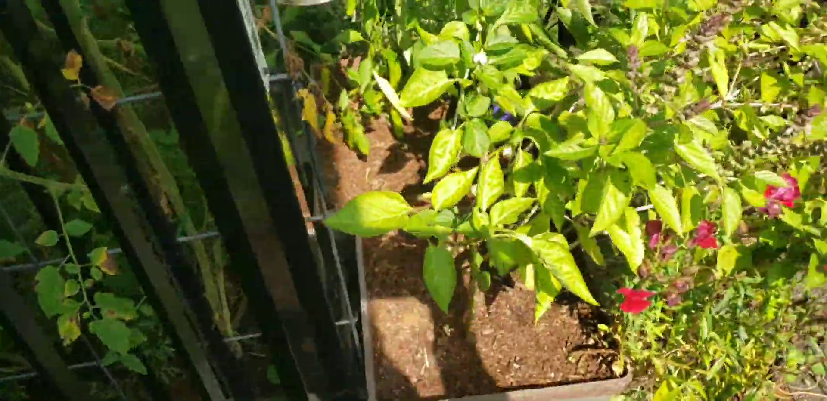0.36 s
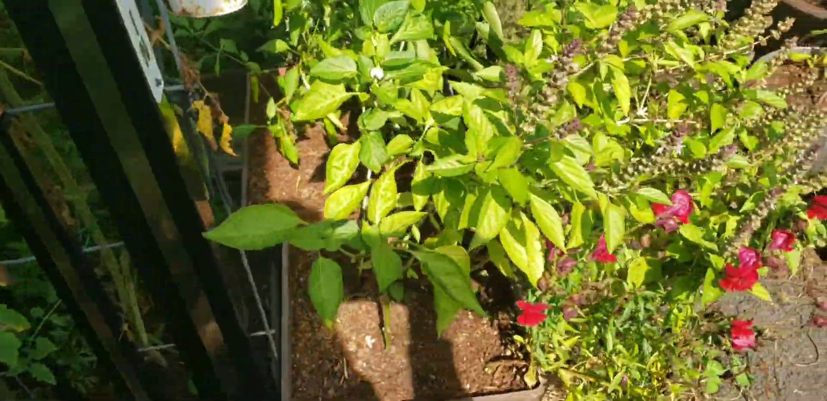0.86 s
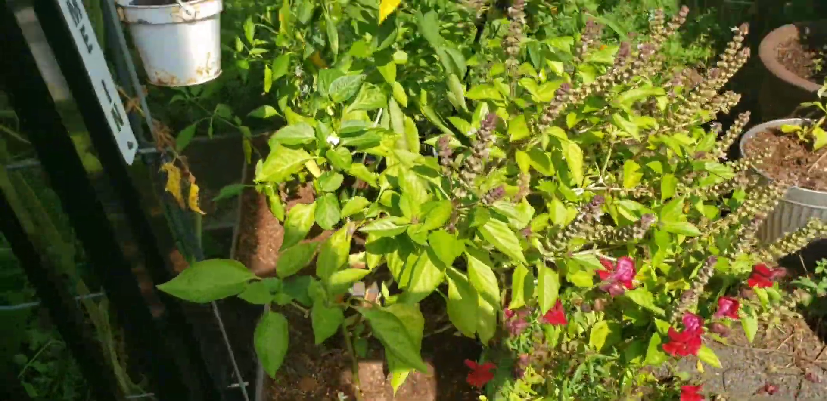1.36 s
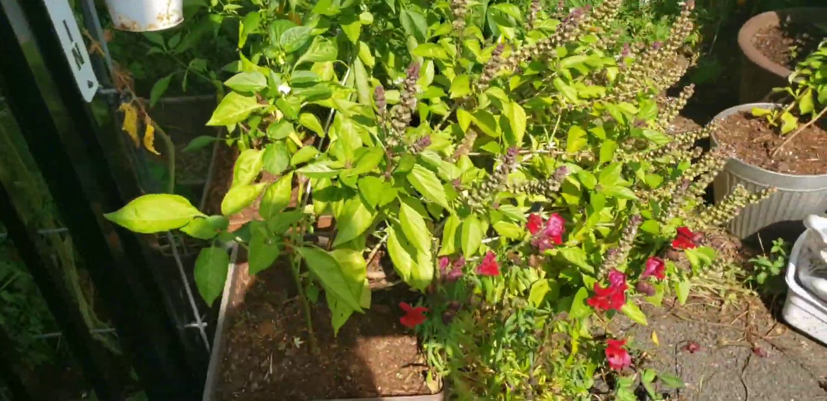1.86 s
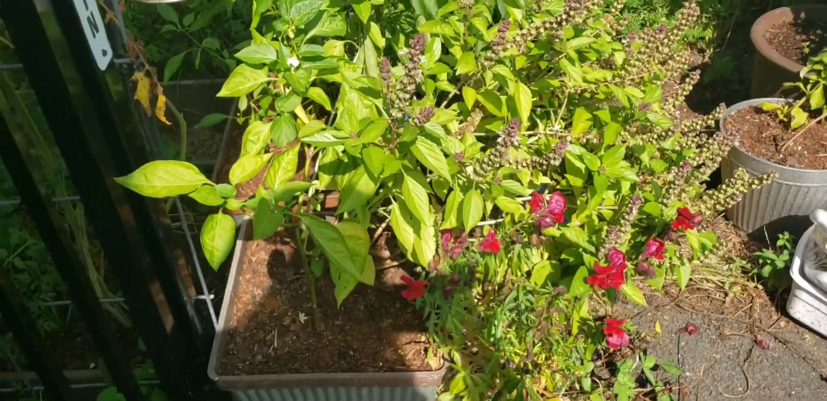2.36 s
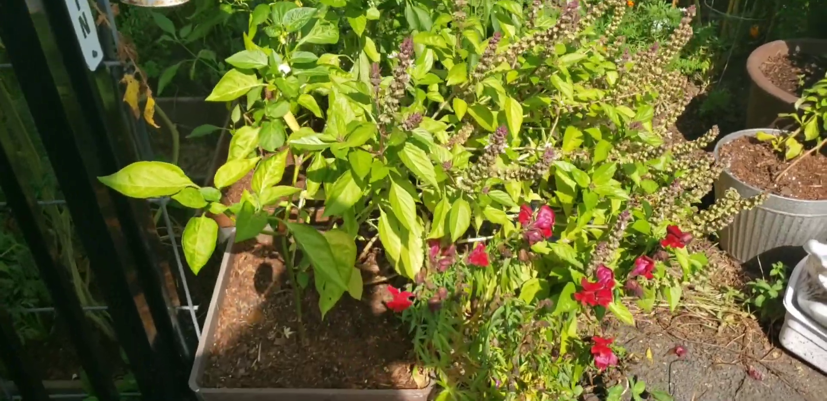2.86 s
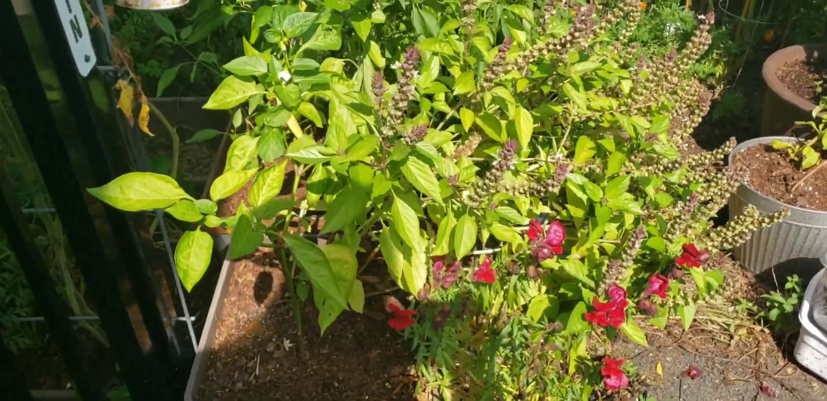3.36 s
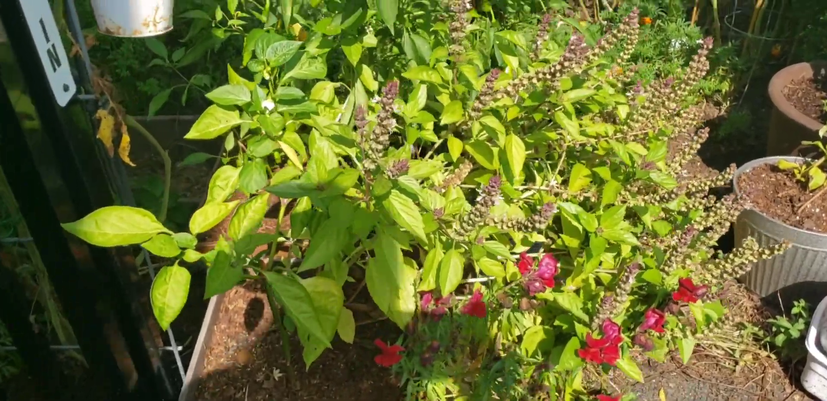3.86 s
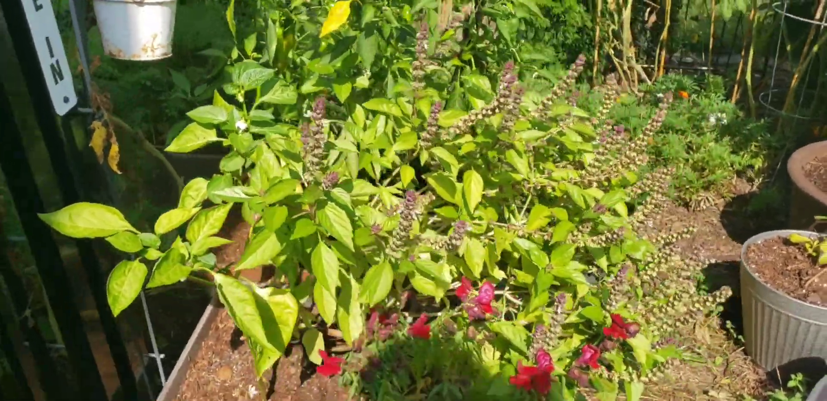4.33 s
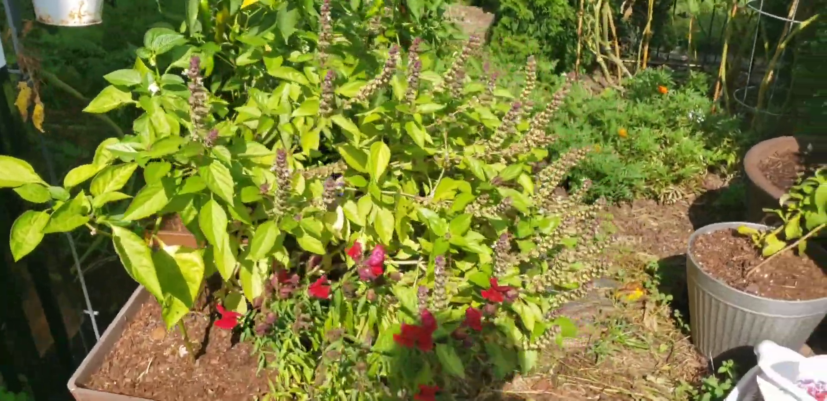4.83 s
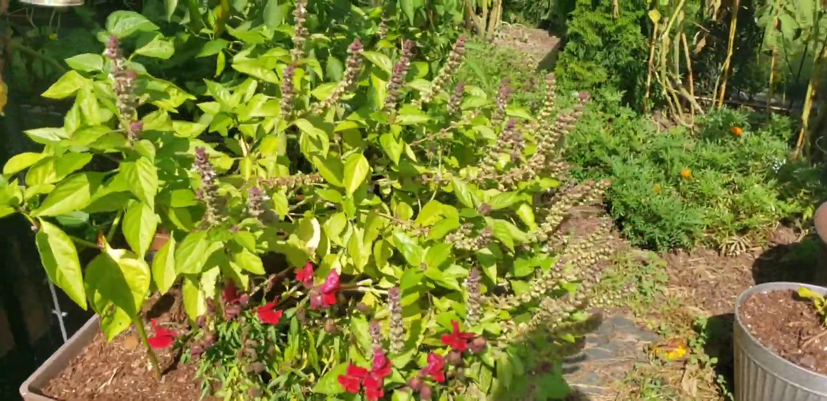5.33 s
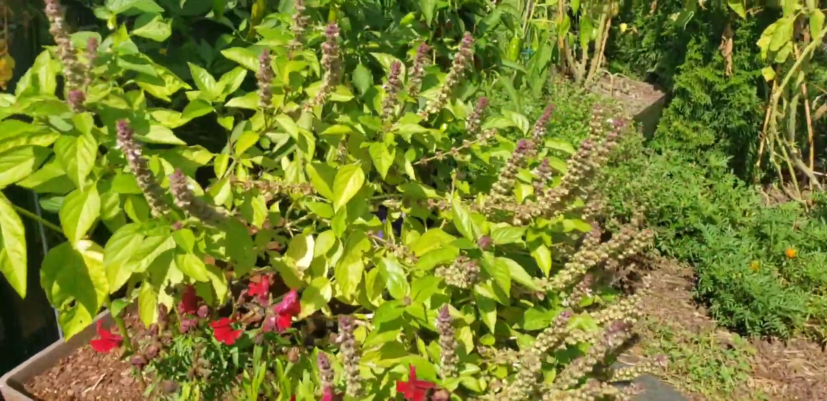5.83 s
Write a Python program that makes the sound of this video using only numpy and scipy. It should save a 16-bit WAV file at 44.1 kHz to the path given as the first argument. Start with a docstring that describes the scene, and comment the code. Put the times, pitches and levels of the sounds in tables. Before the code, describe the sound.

Cicadas drone over a sunny garden while a loose wire fence rattles sharply, then settles as a nearer insect's buzz swells back.

```python
"""A summer garden, on a hand-held stereo recorder: far cicadas, a motor's hum, a dull low wash and air throughout.
At the start one nearer insect buzzes, something brushes past twice, the hand thumps and small ticks fall close by.
From 1.3 s a wire fence is knocked over and over while the buzz sinks away; the knocks thin out towards 5 s.
The buzz then swells again, with a last few ticks. Noise through resonances makes the insects, brushing and
fence; sines make the motor, ticks, thumps and one knock's sharp crack; shaped noise makes the air and low wash."""
import sys
import numpy as np
from scipy import signal
from scipy.fft import rfft, irfft, next_fast_len
from scipy.io import wavfile
from scipy.ndimage import uniform_filter1d

SR = 44100
rng = np.random.default_rng(int(sys.argv[2]) if len(sys.argv) > 2 else 0)


def natural_amplitude(level_db):
    """Convert a level in decibels to a linear amplitude factor, elementwise."""
    exponent = np.asarray(level_db, float) / 20
    return 10 ** exponent


def bounce(signal):
    """Save signal as a 16-bit WAV file at the path given by the first command-line argument."""
    frames = np.transpose(np.atleast_2d(signal))
    limited = np.clip(frames, -1, 1)
    pcm = np.round(limited * 32767).astype(np.int16)
    wavfile.write(sys.argv[1], SR, pcm)


N = 262836


def unit(x):
    """Scale to rms 1."""
    return x / np.sqrt(np.mean(x ** 2))


def curve(rows):
    """Columns of a time table, interpolated at every sample."""
    times, *columns = np.transpose(rows)
    return [np.interp(np.arange(N) / SR, times, column) for column in columns]


def colour(points, size):
    """A (f/Hz, value) table read at every spectrum bin, on a log frequency axis."""
    hz, value = np.transpose(points)
    bins = np.arange(size // 2 + 1) * SR / size
    return np.interp(np.log(bins + 1), np.log(hz), value)


def sides(pan_db):
    """Left and right gains for a left-minus-right level."""
    return natural_amplitude(np.array([pan_db, -pan_db]) / 2).reshape(2, -1)


def ring(x, modes):
    """Sound through resonances (f/Hz, width/Hz, level/dB) that alternate in sign."""
    size = next_fast_len(x.shape[-1])
    f = np.arange(size // 2 + 1) * SR / size + 1e-3  # keeps clear of division by zero
    response = 0
    for k, (hz, width, db) in enumerate(modes):
        response = response + (-1) ** k * natural_amplitude(db) / (1 + 1j * (f / hz - hz / f) * hz / width)
    return irfft(rfft(x, size) * response, size)[..., :x.shape[-1]]


def steep(x, hz, width):
    """One resonance applied twice, for steeper skirts."""
    once = ring(x, [(hz, width, 0)])
    return ring(once, [(hz, width, 0)])


def walk(rate):
    """Slow random wander of rms 1, with about `rate` new values a second."""
    hold = int(SR / rate)
    steps = np.repeat(rng.standard_normal(N // hold + 1), hold)
    smooth = uniform_filter1d(uniform_filter1d(steps, hold), hold)
    return unit(smooth[:N])


def grit(shape, scatter_db):
    """Dense tiny impacts of uneven size."""
    size_db = scatter_db * np.minimum(rng.standard_exponential(shape), 5)
    return unit(rng.standard_normal(shape) * natural_amplitude(size_db))


def spread(x, likeness):
    """Two unrelated rows mixed into left and right with a given correlation."""
    c = np.clip(likeness, -1, 1)
    common = np.sqrt(1 + c) * x[0]
    opposed = np.sqrt(1 - c) * x[1] * np.array([[1], [-1]])
    return (common + opposed) / np.sqrt(2)


def contact(rows, cycles):
    """Short contacts: a few cycles swell for the contact time and die; the nearer side hears them first."""
    out, t = np.zeros((2, N + SR)), np.arange(8192) / SR
    for s, db, hz, pan_db in rows:
        rise = cycles / hz  # contact time in seconds
        body = np.sin(2 * np.pi * hz * t) * t / rise * np.exp(1 - t / rise)
        body = ring(body, [(hz, 2.2 * hz, 0)])  # a small thing radiates little below its pitch
        for side in range(2):
            far_side = (pan_db > 0) == side
            at = int((s - rise) * SR + (12 if far_side else 0))  # delay in samples
            out[side, at:at + len(t)] += natural_amplitude(db) * sides(pan_db)[side] * body
    return out[:, :N]


# air all around the microphones, relative spectrum: f/Hz, level/dB per Hz
AIR_COLOUR = [(20, -27), (50, 6), (110, 2.5), (200, -4.5), (320, -7.5), (520, -26.5), (900, -24),
              (1500, -25), (2200, -41), (3000, -19.5), (8000, -12.5), (12000, -17), (16000, -22)]
# how alike the air is at the two microphones: f/Hz, left-right correlation
AIR_LIKENESS = [(30, -0.2), (80, 0.49), (250, 0.91), (600, 0.085), (1300, -0.95), (3000, -0.79),
                (16000, 0.12)]


def air():
    """Town rumble and leaves as shaped noise; its bass is mostly more alike on both sides."""
    noise = spread(rfft(rng.standard_normal((2, N))), colour(AIR_LIKENESS, N))
    shaped = irfft(noise * natural_amplitude(colour(AIR_COLOUR, N)), N)
    return unit(shaped) * natural_amplitude(-45.5 + 0.097 * walk(1.8))


# dull low wash: distant traffic, with the fence's low rumble in it until about 2.7 s: t/s, level/dB
WASH_LEVEL = [(0, -50.5), (1.2, -59.5), (2.4, -53), (2.85, -70), (3.5, -70), (4.4, -58), (5.0, -62.5),
              (5.7, -67.5)]
# relative spectrum of the low wash: f/Hz, level/dB per Hz
WASH_SPECTRUM = [(150, -14), (300, -1), (800, -4.5), (1000, -14), (1500, -15), (4000, -44)]


def low_wash():
    """Shaped noise, a dull low wash: distant traffic, with the fence's low rumble in it until about 2.7 s."""
    noise = rfft(spread(rng.standard_normal((2, N)), 0.55))
    wash = unit(irfft(noise * natural_amplitude(colour(WASH_SPECTRUM, N)), N))
    level_db, = curve(WASH_LEVEL)
    return wash * natural_amplitude(level_db + 1.2 * walk(9.7))


# shaft tone of the motor: t/s, level/dB
MOTOR_LEVEL = [(0.0, -31.5), (0.08, -42.5), (0.23, -40.5), (0.41, -41), (0.94, -39.5), (1.36, -47),
               (1.81, -48), (1.87, -54), (2.74, -44), (3.17, -46.5), (3.25, -44.5), (4.88, -41),
               (5.93, -45), (5.96, -46)]
# higher motor harmonics that come and go: multiple of the shaft tone, from t/s, to t/s, level/dB
MOTOR_HARMONICS = [(3, -1, 7, -61), (9, 3.62, 4.18, -69), (8, 4.22, 5.2, -69)]


def motor():
    """A rotating shaft hums at its own rate and at multiples of it, all unsteady in level."""
    shaft_hz, second_db = 76.07, -51.5
    first_db, = curve(MOTOR_LEVEL)
    t = np.arange(N) / SR
    turn = 2 * np.pi * shaft_hz * t + 0.33 * walk(3.295)
    out = natural_amplitude(first_db + 1.8 * walk(8.5)) * np.sin(turn)
    out = out + natural_amplitude(second_db + 1.95 * walk(7.8)) * np.sin(2 * turn)
    for multiple, start, end, db in MOTOR_HARMONICS:
        on = np.clip(np.minimum(t - start, end - t) / 0.1, 0, 1)
        harmonic = np.sin(np.round(multiple) * turn + 0.45 * walk(13))
        out = out + on * natural_amplitude(db + 2.3 * walk(12)) * harmonic
    return np.sqrt(2) * out * sides(1.0)  # sqrt(2): the levels are rms


# insects, far and nearer: t/s, chorus level/dB, nearer buzz level/dB, left minus right level/dB
INSECT_LEVELS = [(0, -40, -42.5, 3), (.7, -37.5, -45.5, .5), (1.3, -38.5, -49, 0), (2.7, -39, -61, -1),
                 (3.6, -39.5, -62, -3.5), (4.5, -40.5, -60, -2), (5.1, -39, -52.5, -2.5),
                 (5.96, -41, -46.5, -2)]
# resonances of the far chorus, and a thin faint high line at 14450 Hz, perhaps the buzz's overtone:
# f/Hz, relative width/Hz (broadened below), relative level/dB
INSECT_BANDS = [(2800, 820, -11.5), (3814, 1190, -4), (4690, 1230, -3.5), (5836, 950, 2.5),
                (7100, 610, -4.5), (12600, 3100, -17.5), (14450, 60, -14)]


def insects():
    """Countless tymbal clicks blur into a throbbing band; one insect buzzes in regular pulses above them."""
    chorus_db, buzz_db, pan_db = curve(INSECT_LEVELS)
    throb = 0.34 * walk(8.8)  # dB, shared by all bands
    chorus = 0  # the thin high line rises and falls with it
    for hz, width, db in INSECT_BANDS:
        clicks = spread(grit((2, N), 0.97), 0.0077)
        chorus = chorus + steep(clicks, hz, 1.52 * width) * natural_amplitude(db + throb + 0.24 * walk(7.2))
    # small bodies radiate little below 2100 Hz
    chorus = signal.sosfilt(signal.butter(4, 2100, "high", fs=SR, output="sos"), chorus)

    buzz_hz, buzz_width_hz, pulse_rate_hz = 7500, 340, 57
    phase = np.cumsum(pulse_rate_hz * (1 + 0.049 * walk(3.4))) / SR
    pulses = np.exp(1.05 * np.cos(2 * np.pi * phase))
    strokes = pulses * spread(rng.standard_normal((2, N)), 0.2)
    buzz = steep(strokes, buzz_hz, buzz_width_hz) * natural_amplitude(0.2 * walk(17))
    return (unit(chorus) * natural_amplitude(chorus_db) + unit(buzz) * natural_amplitude(buzz_db)) * sides(pan_db)


# the hand on the recorder: t/s, relative level/dB, f/Hz, left minus right level/dB
HAND_THUMPS = [(.014, -25.5, 75.7, -8), (.242, -30, 72, -7), (1.29, -38, 50, 11), (2.555, -41, 53.5, -20)]


def thumps():
    """The hand thumps the recorder: low, short contacts of 0.68 cycles."""
    return contact(HAND_THUMPS, 0.68)


# brushing close by: start t/s, length t/s, hiss level/dB, hollow note level/dB, left minus right level/dB
BRUSH_STROKES = [(0.03, 0.37, -38, -45, -4), (0.315, 0.27, -38, -42.5, 19.5)]
# resonances of the brushing hiss: f/Hz, width/Hz, relative level/dB
BRUSH_HISS = [(2300, 700, 2), (4600, 1170, 11), (10800, 4900, 1.5)]


def brush():
    """Gritty friction that swells and fades, with a hollow note near 1 kHz."""
    rise, fall = 0.21, 0.64  # shares of the stroke's length
    rub = spread(grit((2, N), 3.1), 0.061)
    hiss = unit(ring(rub, BRUSH_HISS))
    hollow = unit(steep(rub, 1110, 1150))
    t = np.arange(N) / SR
    out = 0
    for s, length, hiss_db, hollow_db, pan_db in BRUSH_STROKES:
        along = (t - s) / length
        ramp = np.clip(np.minimum(along / rise, (1 - along) / fall), 0, 1)
        swell = np.sin(np.pi / 2 * ramp) ** 2
        out = out + swell * sides(pan_db) * (natural_amplitude(hiss_db) * hiss + natural_amplitude(hollow_db) * hollow)
    return out


# ticks close to the microphones, and at 1.497 s the sharp crack of a fence knock:
# t/s, body relative level/dB, body f/Hz, bright snap relative level/dB, left minus right level/dB
TICKS_AND_CRACK = [(.15, -45, 3000, -11, 6), (.233, -27, 1000, -72, -15), (.243, -28.5, 430, -60, -14),
                   (0.3129, -28, 2300, -45, 33), (.316, -14.5, 3240, -20, 26.5),
                   (0.7889, -25.5, 1960, -20, 18), (1.09, -60, 2860, -44, 8), (1.215, -55, 3000, -38, 0.1),
                   (1.3135, -18, 1780, -19, 2), (1.497, -5, 5000, -16, 5), (2.5222, -23, 1020, -45, 22),
                   (2.5497, -17, 2600, -7, 21), (2.5568, -9.5, 2800, -16, 10), (5.256, -40, 1510, -60, 3),
                   (5.302, -33.5, 730, -55, 3), (5.309, -36, 1340, -55, 10), (5.315, -29, 2400, -55, -7),
                   (5.837, -34, 1650, -55, -5)]


def ticks_and_crack():
    """Each tick, and the knock's crack, is a pitched body under a bright snap that is panned half as far."""
    snap_hz, body_cycles, snap_cycles = 11400, 0.32, 0.42  # contact times in cycles of the pitch
    bodies = [(s, body_db, hz, pan_db) for s, body_db, hz, _, pan_db in TICKS_AND_CRACK]
    snaps = [(s, snap_db, snap_hz, pan_db / 2) for s, _, _, snap_db, pan_db in TICKS_AND_CRACK]
    return contact(bodies, body_cycles) + contact(snaps, snap_cycles)


# knocks on the wire fence: t/s, thick wires relative level/dB, their loudest f/Hz,
# thin wires relative level/dB, decay by 60 dB t/s (scaled for each part below)
FENCE_KNOCKS = [(1.263, -38.5, 2330, -34, 0.22), (1.4404, -17.5, 2300, -9, 0.17),
                (1.4959, -22, 2660, -12, 0.28), (1.5484, -22, 2600, -26, .18),
                (1.5684, -19.5, 2600, -13.5, 0.21), (1.698, -21.5, 2440, -29, 0.12),
                (1.7235, -25, 2650, -31, 0.18), (1.7777, -27, 2430, -17, 0.13),
                (1.8553, -29, 2100, -51, 0.12), (1.935, -29.5, 3160, -20.5, 0.14),
                (2.0167, -17, 2600, -17, 0.24), (2.0942, -25, 2220, -17, 0.2),
                (2.178, -19.5, 2400, -17.5, .21), (2.2268, -22.5, 2600, -39, 0.078),
                (2.2583, -26, 2550, -20, 0.17), (2.3396, -23, 3450, -20.5, 0.26),
                (2.4222, -30.5, 2450, -18.5, 0.17), (2.514, -23, 1990, -22, 0.16),
                (2.605, -54, 2680, -24.5, 0.11), (2.6807, -29, 2700, -35.5, 0.24),
                (2.7843, -58, 2800, -38.5, 0.2), (2.8406, -41, 3100, -41, 0.28),
                (2.8737, -37.5, 3130, -49, 0.26), (2.9832, -36, 3240, -25.5, 0.18),
                (3.047, -37.5, 1630, -52, 0.26), (3.0809, -36.5, 1460, -39, 0.28),
                (3.301, -37.5, 2660, -40, 0.2), (3.52, -38, 2330, -43, .21), (3.5848, -41, 2360, -48, 0.32),
                (3.718, -45, 1820, -51, 0.59), (3.8796, -44, 2680, -48, 0.22),
                (4.0245, -44.5, 1670, -41, 0.37), (4.119, -52, 1700, -56, 0.54),
                (4.354, -44.5, 2650, -51, 0.22), (4.786, -47, 2560, -52, 0.087),
                (4.892, -46, 2550, -44, 0.1), (5.063, -45.5, 2610, -54, 0.1)]
# fence modes before each knock stirs them: f/Hz, width/Hz, relative level/dB
FENCE_MODES = [(354, 120, -6.5), (758, 69, -2), (1220, 310, 1), (1480, 21, -1.5), (1616, 350, -3.5),
               (1662, 166, 2), (2030, 630, -16.5), (2400, 38, 3), (2600, 920, -6), (2572, 71, 3),
               (3240, 59, -2.5), (4000, 90, -2.5), (4290, 68, -1.5), (4850, 140, -0.5), (5297, 180, 7),
               (5335, 270, 6.5), (5660, 28, 6), (6104, 83, 2.5), (6910, 290, -5), (8000, 510, -16),
               (10400, 2160, 7), (12250, 680, 11), (13100, 1000, -12), (14700, 330, -4), (15100, 900, 0)]


def rattle():
    """Each knock is a shower of contacts between loose wires; every knock stirs the modes differently."""
    out, size = np.zeros((2, N + SR)), 2 ** 14
    t, fence = np.arange(size) / SR, np.array(FENCE_MODES)
    part = np.digitize(fence[:, 0], [1350, 3500, 9000])  # Hz: posts, thick wires, thin wires, jingle
    slowness = (2.6, 1.3, 0.98, 0.79)  # thick parts build up slower and ring longer than thin ones
    pans_db = (2.5, 2.5, 2.5, 0)  # the treble reaches the right side better
    right_lag = 20  # samples by which the left side hears the fence first
    for s, low_db, struck_hz, high_db, t60 in FENCE_KNOCKS:
        contacts = spread(grit((2, size), 2.4), 0.17)
        chance = rng.standard_normal((len(fence), 2))
        modes = fence.copy()
        modes[:, 0] += 0.02 * fence[:, 0] * chance[:, 0]
        modes[:, 2] += 2.5 * chance[:, 1]
        # the wire that was hit stands out among its neighbours
        modes[:, 2] += 10.4 * np.exp(-(np.log(modes[:, 0] / struck_hz) / 0.15) ** 2)
        modes[:, 1] *= 1 + 12 * natural_amplitude(low_db)  # hard knocks keep the wires touching, which damps them
        # posts grow faster than the thick wires, the jingle faster than the thin ones
        levels_db = (-7 + 1.19 * low_db, low_db, high_db, 2 + 1.303 * high_db)
        knock = 0
        for k, (part_db, slow, pan_db) in enumerate(zip(levels_db, slowness, pans_db)):
            build_up = 1 - np.exp(-t / (0.0016 * slow))
            shower = build_up * np.exp(-np.log(1000) * t / (t60 * slow))
            part_modes = modes[part == k]
            loudness = np.sqrt(np.mean(ring(contacts, part_modes) ** 2))
            knock = knock + sides(pan_db) * natural_amplitude(part_db) / loudness * ring(shower * contacts, part_modes)
        start = int((s - 0.003) * SR)  # the shower begins 3 ms ahead of the listed time
        for side, at in enumerate((start, start + right_lag)):
            out[side, at:at + size] += knock[side]
    return out[:, :N]


def yard(x, t60, wet_db):
    """Walls and paving return a short, dull scatter from 8 ms on."""
    t = np.arange(SR // 3) / SR
    tail = rng.standard_normal((2, len(t))) * np.exp(-np.log(1000) * t / t60) * (t > 0.008)
    tail = ring(tail, [(2200, 2000, 0)])
    tail = tail / np.sqrt(np.sum(tail[0] ** 2))
    return x + natural_amplitude(wet_db) * signal.fftconvolve(x, tail, axes=1)[:, :N]


def scene():
    """Near events in the yard over insects, motor, low wash and air, with the hand on the recorder."""
    background = air() + low_wash() + motor() + insects()
    near = brush() + ticks_and_crack() + rattle()
    return background + thumps() + yard(near, 0.55, -17.5)


def band_limit(x):
    """A steep low-pass at the top of the band."""
    return signal.sosfilt(signal.butter(12, 16470, fs=SR, output="sos"), x)


# response of the recorder's two microphones: f/Hz, level/dB
MIC_RESPONSE = [(20, 0), (7700, 1.5), (8200, -5.5), (10000, -5), (12200, -1), (15000, -8), (15900, -15),
                (16400, -37), (22000, -50)]


def record(dry):
    """The microphones are duller above 8 kHz but for a small peak; anything past full scale is clipped."""
    padded = np.pad(dry, ((0, 0), (2048, 2048)), "reflect")  # mirrored ends take up the filter's wrap-around
    size = padded.shape[1]
    heard = irfft(rfft(padded) * natural_amplitude(colour(MIC_RESPONSE, size)), size)[:, 2048:-2048]
    return band_limit(np.clip(heard, -1, 1))


dry = scene()
out = record(dry)
bounce(out)
```